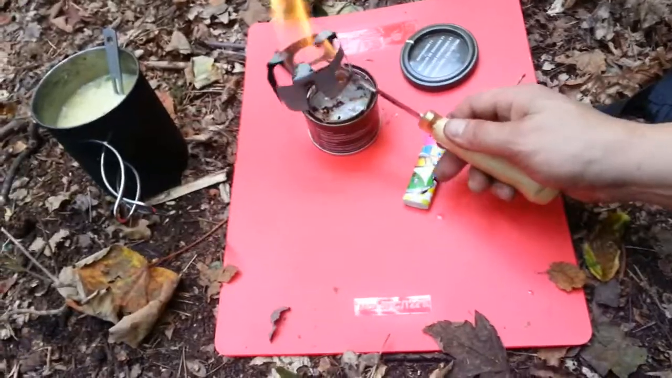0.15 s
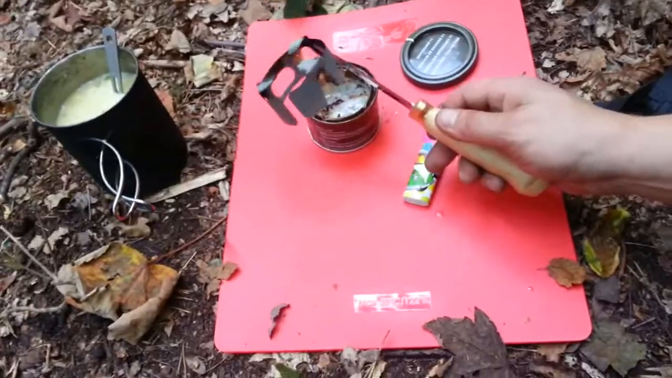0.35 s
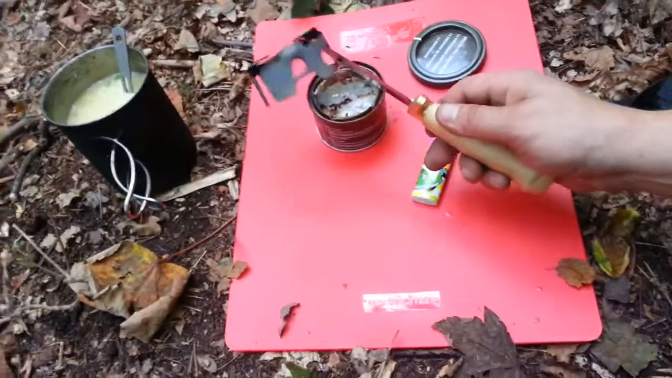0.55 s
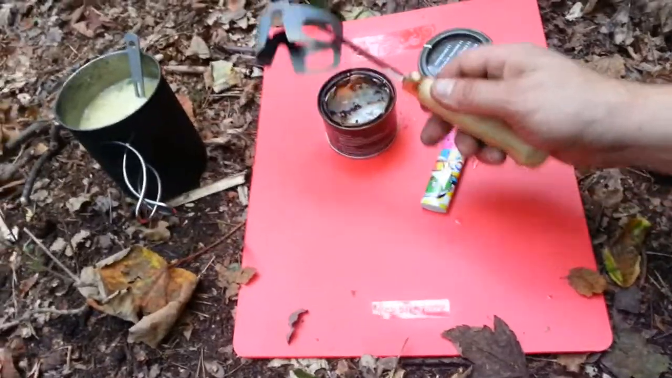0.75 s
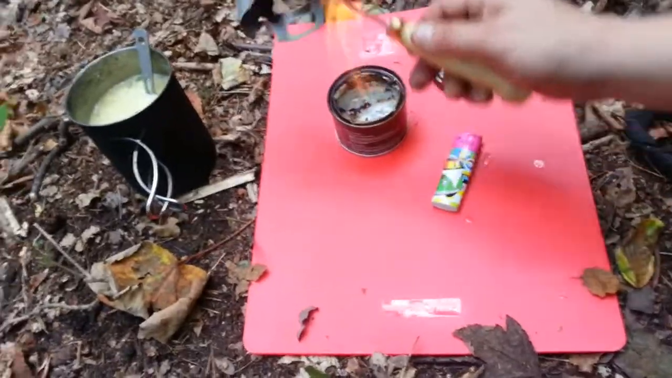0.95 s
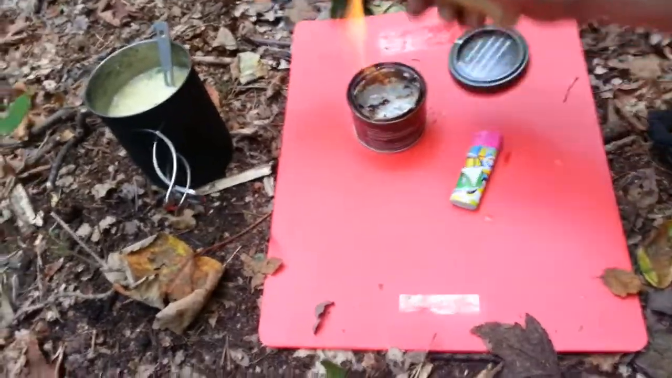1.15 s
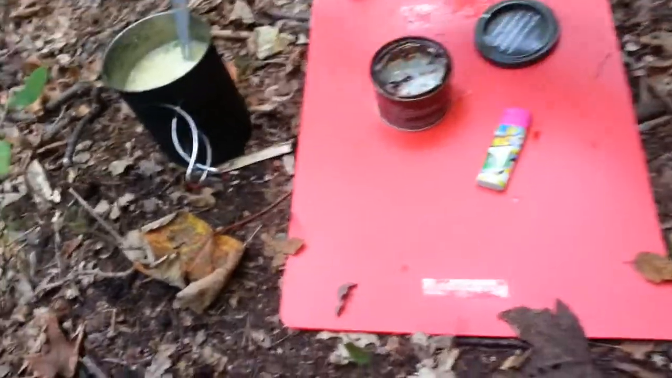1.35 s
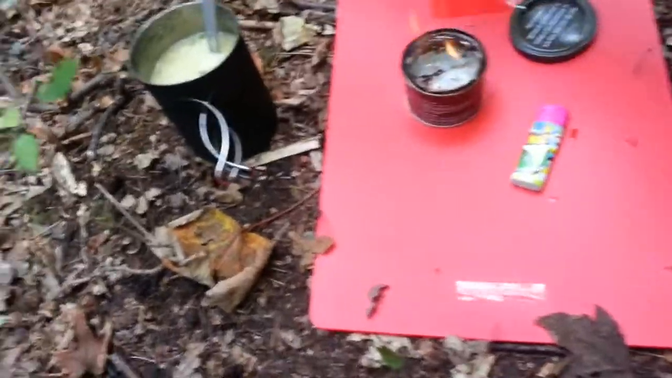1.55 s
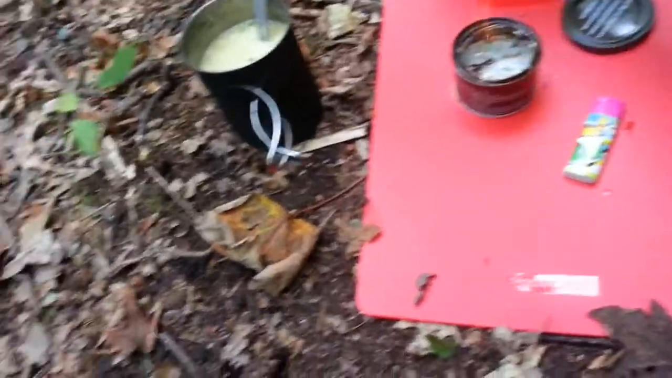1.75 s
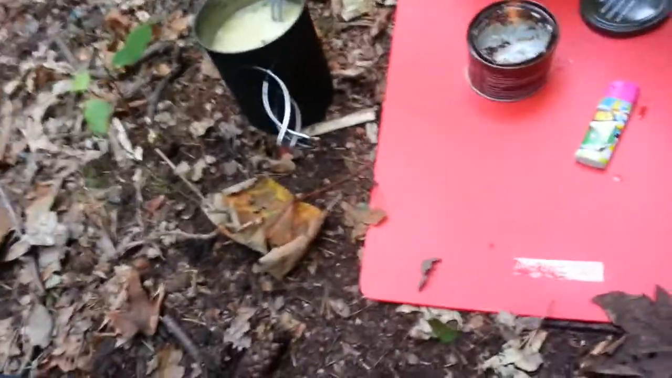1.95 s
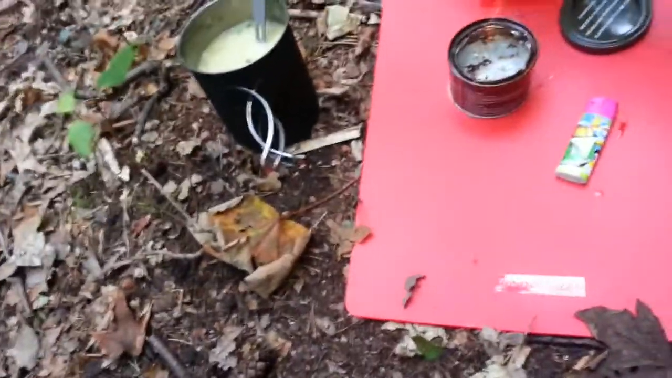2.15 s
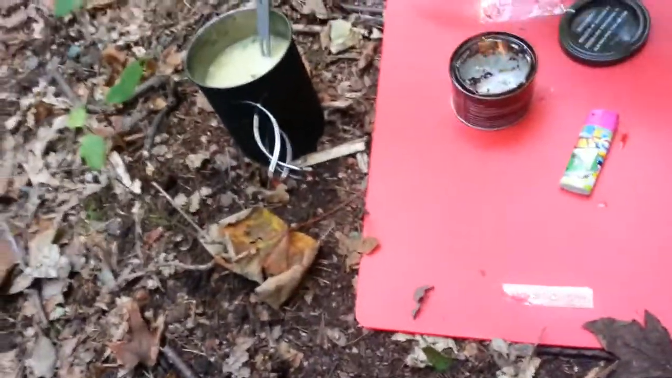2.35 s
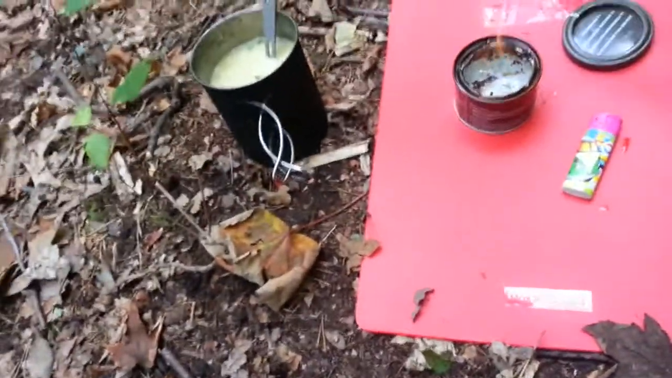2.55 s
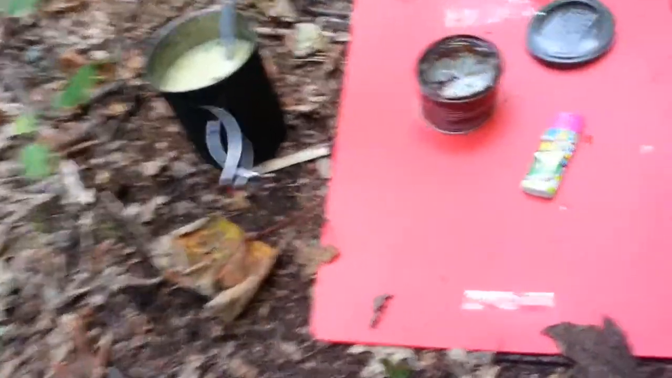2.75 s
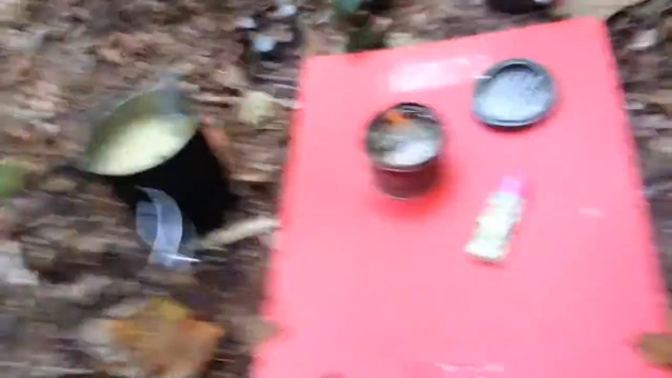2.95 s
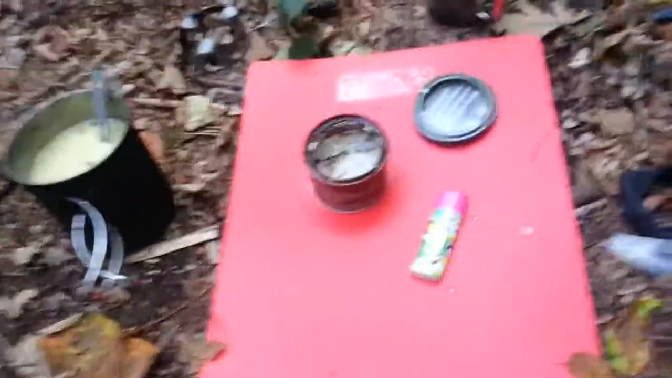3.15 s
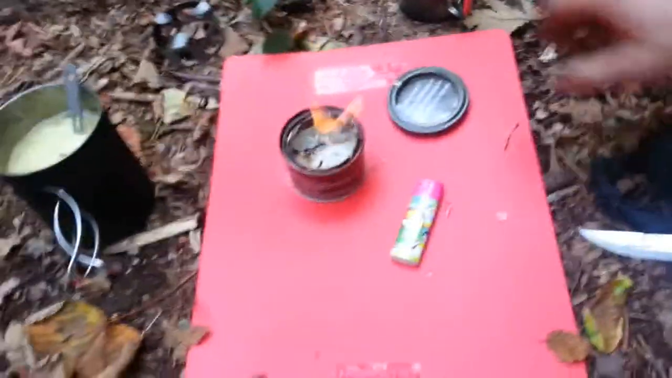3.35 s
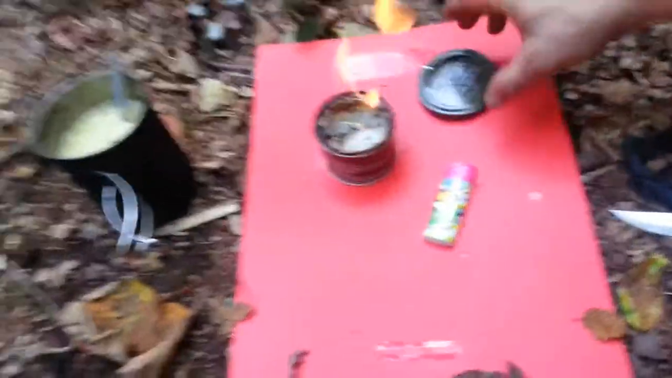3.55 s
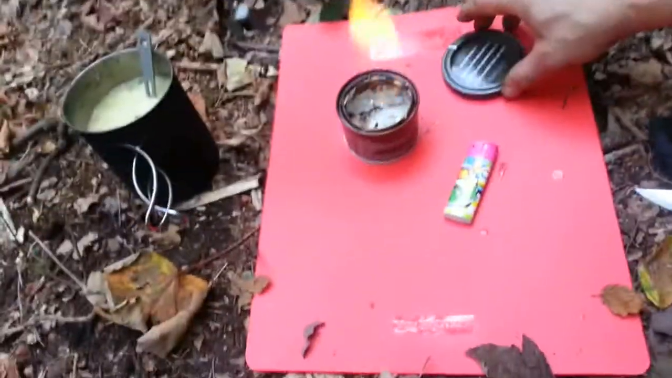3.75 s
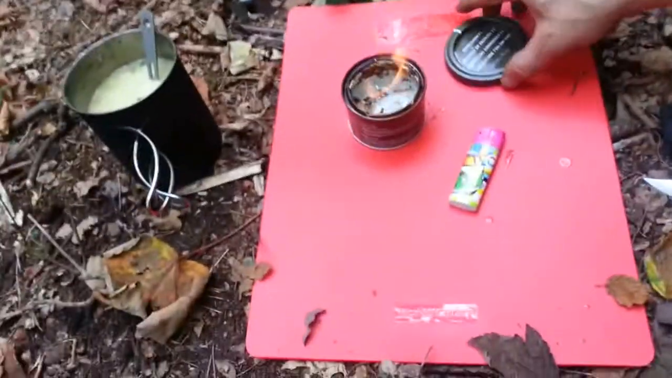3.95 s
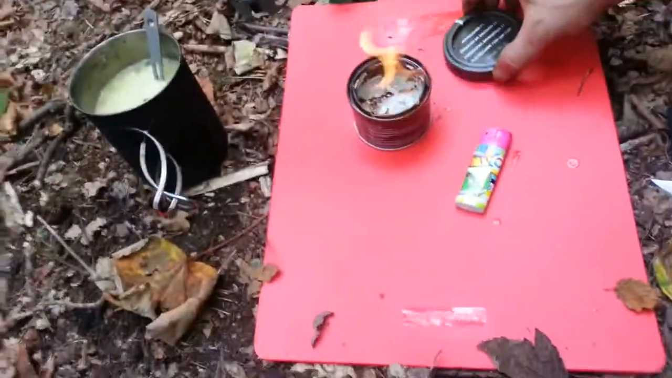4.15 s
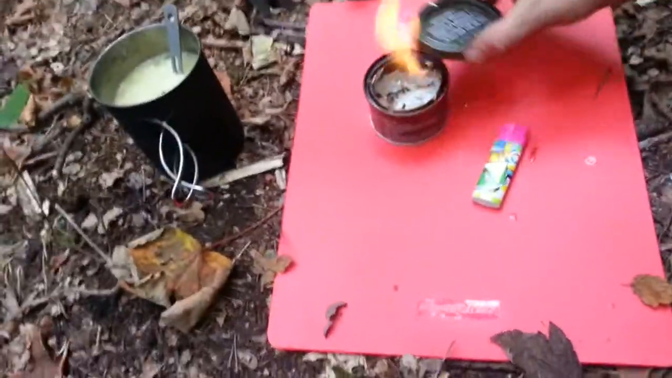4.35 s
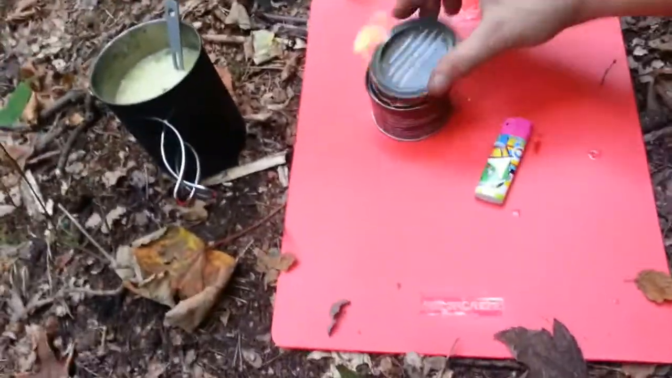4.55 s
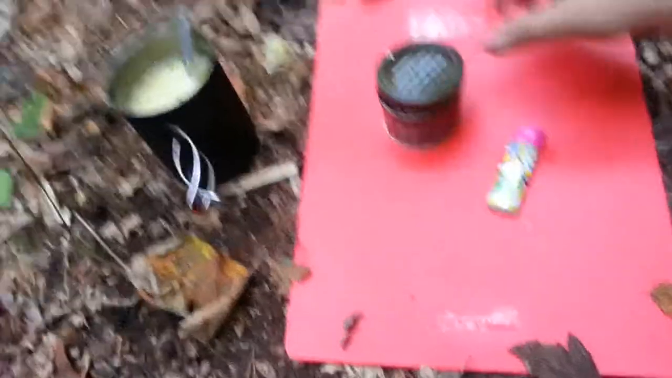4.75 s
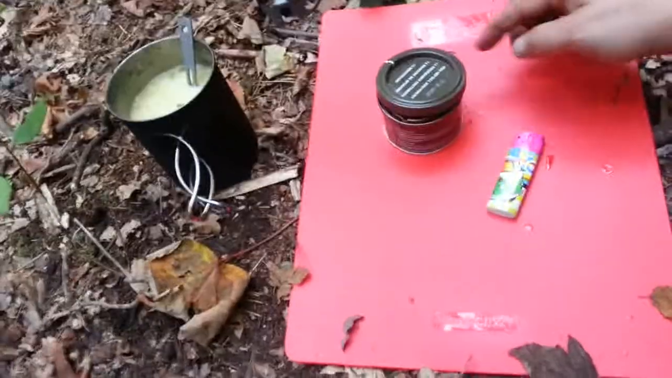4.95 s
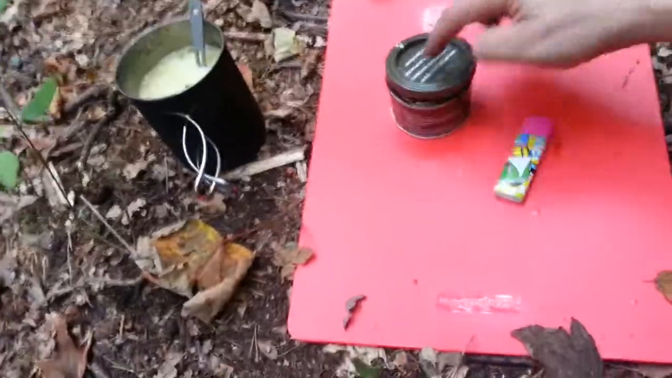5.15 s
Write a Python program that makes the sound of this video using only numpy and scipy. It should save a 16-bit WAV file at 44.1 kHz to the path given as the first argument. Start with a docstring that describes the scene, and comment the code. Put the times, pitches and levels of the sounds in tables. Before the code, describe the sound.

Close metal clicks, scrapes and a sharp clink, soft thuds and leaf snaps, then a loud tin lid clatter in quiet woods.

```python
"""A sheet-steel pot stand, lifted off a tin burner with a knife, on a foam mat in the woods.
Close to a stereo pair, the blade taps and scrapes the steel into ringing; the stand drops among leaves.
The knife is laid down with dull knocks, and dry leaves snap underfoot. A tin lid is picked up and
dropped onto the burner, where it rattles until it seats. Sleeves rustle with the arm movements;
behind it all lie a distant rumble and the quiet hiss of the woods."""
import sys
import numpy as np
from scipy import signal
from scipy.io import wavfile
from scipy.ndimage import uniform_filter1d

SR = 44100
rng = np.random.default_rng(int(sys.argv[2]) if len(sys.argv) > 2 else 0)


def transcribe(u):
    """Save the signal u as a 16-bit wav file named by the first command-line argument.

    u: samples, shape (n,) or (channels, n), limited to [-1, 1]; the rate is SR.
    q: integer samples, one column per channel.
    """
    v = np.clip(np.atleast_2d(u).T, -1, 1)
    q = np.round(v * 32767).astype(np.int16)
    wavfile.write(sys.argv[1], SR, q)


N = 228879


def amp(db):
    return 10 ** (np.asarray(db) / 20)


def rms_one(x):
    return x / np.sqrt(np.mean(x ** 2) + 1e-20)


def at_hz(points, hz):
    freqs, values = np.transpose(points)
    return np.interp(np.log(hz), np.log(freqs), values)


def pan(x, db):
    """Place a sound between the microphones; pan is always left minus right in dB."""
    return np.array([x * amp(db / 2), x * amp(-db / 2)])


def add(out, s, piece):
    at = max(round(s * SR), 0)
    out[:, at:at + piece.shape[1]] += piece[:, :N - at]


def onset(t):
    return np.sin(np.pi / 2 * np.clip(t / 0.0011, 0, 1)) ** 2


def drift(rate_hz):
    """A smooth random wander with an RMS of 1."""
    r = np.exp(-80 * np.pi * rate_hz / SR)
    slow = signal.lfilter([1], [1, -2 * r, r * r], rng.standard_normal(N // 40 + 2002))[2000:]
    return np.interp(np.arange(N) / 40, np.arange(len(slow)), rms_one(slow))


def band(x, hz, octaves):
    edges = np.clip(hz * 2 ** (np.array([-.5, .5]) * max(octaves, .1)), [20, 30], [19000, 20000])
    return signal.sosfilt(signal.butter(2, edges, "band", fs=SR, output="sos"), x)


def moving_band(x, centre_hz, steps_hz, fall_db):
    """Third-octave bands that open near a moving centre."""
    return sum(band(x * amp(-fall_db * np.log2(hz / centre_hz) ** 2), hz, 1 / 3) for hz in steps_hz)


def crack(hz, octaves, t60, noise):
    """A burst of contact noise that swells for a millisecond, steeply banded, peak 1."""
    t = np.arange(noise.shape[-1]) / SR
    burst = band(band(noise * onset(t) * amp(-60 * t / t60), hz, octaves), hz, 2.1 * octaves)
    return burst / np.abs(burst).max()


def strokes(rows, round_top):
    """Swells whose rise and fall span 20 dB: level/dB, time from the peak/s, then the other columns."""
    t = np.arange(0, N + 32, 32) / SR
    s, db, rise, fall, *columns = np.transpose(rows)[:, :, None]
    since = t - s
    lengths = np.where(since < 0, -since / rise, since / fall)
    gain = amp(np.maximum(db - 20 * lengths ** round_top, -200))
    total = gain.sum(axis=0)
    blended = [(gain * c).sum(axis=0) / total for c in (since, *columns)]
    return [np.interp(np.arange(N) / SR, t, c) for c in (20 * np.log10(total), *blended)]


# Likeness of diffuse noise at the two microphones: f/Hz, correlation
LIKENESS = [(60, 0.49), (150, 1), (370, 0.7), (930, -0.012), (2310, -0.048), (5770, 0.11), (14400, -0.13)]


def stereo_bands(colour, flicker_db, white):
    """Half-octave bands of stereo noise, each with its level, flicker and likeness: f/Hz, band."""
    together = drift(14)
    for k, hz in enumerate(30 * 2 ** np.arange(0, 9.4, .5)):
        mid, side = band(white[k % 2], hz, 0.46)
        alike = at_hz(LIKENESS, hz)
        gain = amp(at_hz(colour, hz) + flicker_db * (0.13 * together + drift(23.4)))
        yield hz, gain * (np.sqrt(1 + alike) * mid + np.sqrt(1 - alike) * side * [[1], [-1]])


# Background rumble and hiss, with the lid's halo near 4.55 s: t/s, rumble/dB, hiss or halo/dB
BACKGROUND = [(0, -54.5, -52.5), (.4, -62, -58.5), (.6, -58.5, -53.5), (.8, -63.5, -56), (1.1, -56.5, -50),
              (1.6, -63, -58.5), (1.8, -53.5, -50), (2.2, -59, -53), (2.45, -60.5, -56), (2.9, -59, -53.5),
              (3.35, -62.5, -56.5), (3.75, -61.5, -60.5), (3.92, -56.5, -55), (4.4, -64.5, -62.5),
              (4.55, -65, -38.5), (4.7, -54.5, -46.5), (4.85, -65, -61), (5.19, -60, -54.5)]
# Their spectrum: f/Hz, relative level/dB
BACKGROUND_COLOUR = [(15, -35), (25, -13.5), (85, -7), (512, -19), (1110, -17), (1800, -25), (2000, -23),
                     (3150, -30), (3500, -27.5), (14800, -33)]


def background():
    """Rumble below 250 Hz, hiss above; the hiss flares with the lid's rattle while the rumble ducks."""
    s, *levels_db = np.transpose(BACKGROUND)
    t, parts = np.arange(N) / SR, np.zeros((2, 2, N))
    for hz, noise in stereo_bands(BACKGROUND_COLOUR, 1.5, rng.standard_normal((2, 2, N))):
        parts[int(hz > 250)] += noise
    return sum(amp(np.interp(t, s, db)) * rms_one(part) for db, part in zip(levels_db, parts))


STAND_LAG_S = 0.0001933


def from_stand(x, pan_db):
    """The stand reaches the left microphone a little later."""
    late = np.pad(x, (round(STAND_LAG_S * SR), 0))[:len(x)]
    return np.array([late, x]) * pan(1, pan_db)[:, None]


# The stand, faintly ringing at the start: f/Hz, level/dB, t60/s
FADING_MODES = [(3680, -49.5, 0.29), (7200, -38, 0.08), (1165, -58.5, 0.44)]


def fading_ring():
    """Three modes of the steel die away from an earlier touch."""
    out, t = np.zeros((2, N)), np.arange(SR // 4) / SR
    hz, db, t60 = np.transpose(FADING_MODES)[:, :, None]
    modes = amp(db - 60 * t / t60) * np.sin(2 * np.pi * hz * t)
    add(out, 0, from_stand(modes.sum(axis=0), -2.5))
    return out


# Modes of the steel stand: f/Hz, relative level/dB, nominal decay time/s (a tap falls 75 dB over it before
# added damping)
STAND_MODES = [(3047, 0, 0.3), (4560, 0.5, 0.079), (5080, 6.5, 0.057), (5530, 6, 0.039), (5800, -12, 0.16),
               (5980, -10.5, 0.34), (6310, 0, 0.24), (6150, -13, 0.36), (6990, 2, 0.14), (7230, 1, 0.18),
               (7360, -2, 0.093), (7730, -1.5, 0.12), (8100, -10, 0.3), (9100, -12, 0.28), (9900, -23, .12),
               (11100, -14, 0.3), (11500, -11, 0.1), (12900, -24.5, 0.115), (13400, -16, 0.14)]
# Blade on the stand, close by: t/s, level/dB, crack f/Hz, pan/dB, relative ring level/dB
BLADE_TAPS = [(0.2733, -24.5, 7100, -6.5, -19.5), (0.324, -33, 7040, -23.5, -37),
              (0.5884, -25, 6960, -21.5, -25), (0.756, -37, 6850, -11, -35), (0.959, -40.5, 2470, 13, -9),
              (1.3316, -31, 7230, 5, -18.5), (1.4448, -36, 7040, -9, -27), (1.494, -33.5, 7500, 1, -19),
              (1.7068, -28, 7400, -12.5, -18), (1.724, -14.5, 6650, -25, -37),
              (1.7792, -27.5, 5070, 17, -7.5), (1.842, -1.5, 7560, -5, -17), (2.0154, -25, 5130, 10, -21),
              (2.049, -28.5, 5070, 18, -32), (2.0597, -20.5, 5360, 6, -33), (2.1223, -27, 5140, 21, -38),
              (2.1552, -28, 7040, -11, -34), (2.2005, -30.5, 7550, -16.5, -25), (2.2644, -41, 5540, 4, -30),
              (2.327, -33, 7200, -3, -23)]


def blade_taps():
    """Each touch cracks and rings most the modes near its own pitch; the grip shifts them a little."""
    out, t = np.zeros((2, N)), np.arange(SR // 4) / SR
    hz, db, t60 = np.transpose(STAND_MODES)[:, :, None]
    for s, level_db, centre_hz, pan_db, ring_db in BLADE_TAPS:
        uneven, detune = rng.standard_normal((2, *hz.shape))
        noise = rng.standard_normal(SR // 10)
        held_db = 12 * max(-level_db - 8, 0) * t   # a light touch stays in contact and damps the ring
        near_db = 4 * uneven - 8 * np.log2(hz / centre_hz) ** 2
        swing = onset(t) * amp(db + ring_db + near_db - held_db - 75 * t / t60)
        sound = (swing * np.sin(2 * np.pi * hz * (1 + 0.00377 * detune) * t)).sum(axis=0)
        tick = 1.08 * crack(centre_hz, 0.37, 0.013, noise) + 0.15 * crack(centre_hz, 1.44, 0.045, noise)
        hollow_body = amp(ring_db) * crack(2967, 0.19, 0.067, noise)
        sound[:len(noise)] += tick + hollow_body
        add(out, s, amp(level_db) * from_stand(sound, pan_db))
    return out


# Blade along the stand, left of centre: peak t/s, level/dB, rise/s, fall/s, f/Hz, relative rasp/dB
BLADE_STROKES = [(.279, -49.5, 0.0065, 0.043, 6700, 1.5), (.56, -39, 0.11, 0.12, 6250, -16),
                 (.748, -55.5, 0.0081, 0.06, 6700, -8), (1.44, -54.5, 0.0078, 0.28, 6700, -9),
                 (1.745, -33.5, 0.026, 0.1, 6400, -22.5), (1.788, -36, 0.0078, 0.046, 5370, -17),
                 (1.85, -40.5, 0.0065, 0.17, 6500, -16), (2.07, -40.5, 0.041, 0.056, 5300, -6),
                 (2.118, -32, 0.054, 0.021, 6100, -22.5), (2.16, -46, 0.063, 0.21, 7150, -18),
                 (2.73, -49.5, 0.13, 0.15, 6400, -6.5), (2.86, -50.5, .03, 0.026, 6170, -6)]
SCRAPE_SAG_HZ_PER_S = 1800


def blade_scrape():
    """Dense uneven slips feed a hiss that sinks along each stroke, a low rasp and the stand's modes."""
    level_db, since, centre_hz, rasp_db = strokes(BLADE_STROKES, round_top=1.43)
    centre_hz = np.clip(centre_hz - SCRAPE_SAG_HZ_PER_S * since, 3000, 12000)
    slips = rng.standard_normal((2, N)) * amp(3.7 * drift(160) + level_db)
    slips[0] = 1.804 * slips[0] + 0.33 * np.roll(slips[1], round(STAND_LAG_S * SR))
    hiss = 1.74 * moving_band(slips, centre_hz, 3600 * 2 ** np.arange(0, 2, 1 / 3), fall_db=25)
    rasp = slips * amp(rasp_db)
    out = hiss + 2 * band(rasp, 2000, 2.63) + 1.8 * band(rasp, 2850, 0.68)
    for hz, db, t60 in STAND_MODES[1:13]:
        r = amp(-130 / (t60 * SR))   # the pressing blade damps the mode
        w = 2 * np.pi * hz / SR
        fed = slips * amp(db - 31.5 - 29 * np.log2(hz / centre_hz) ** 2)
        out += signal.lfilter([0, np.sin(w)], [1, -2 * r * np.cos(w), r * r], fed)
    return out * pan(1, 1.1)[:, None]


# Dull knocks on mat and ground, mostly to the left: t/s, level/dB, f/Hz, t60/s, pan/dB
KNOCKS = [(0.883, -35.5, 193, 0.017, 5), (2.264, -29, 400, 0.005, 8), (2.955, -35, 1200, 0.024, 7),
          (3.01, -29.5, 850, 0.018, 25.5), (3.016, -21.5, 810, 0.012, -5), (3.042, -16.5, 1080, 0.026, 6),
          (3.065, -26, 210, 0.03, 1), (3.092, -27, 233, 0.019, 1), (3.824, -23, 1530, 0.011, 8),
          (3.897, -23.5, 1410, 0.013, 6), (5.108, -45.5, 970, 0.035, 12), (5.131, -36, 925, 0.058, -13),
          (5.142, -35, 930, 0.023, 23), (5.151, -39.5, 1010, 0.087, -7)]


def knocks():
    """A short push into one damped resonance, with a dull puff around it and a faint click."""
    out, t = np.zeros((2, N)), np.arange(SR // 10) / SR
    for s, level_db, hz, t60, pan_db in KNOCKS:
        noise = rng.standard_normal(len(t))
        body = 1.1 * np.sin(2 * np.pi * hz * t) * onset(t) * amp(-60 * t / t60)
        puff = 0.5 * crack(hz / 2, 2.28, t60, noise)
        click = 0.11 * crack(4 * hz, 2.2, 0.04, noise)
        add(out, s, amp(level_db) * pan(body + puff + click, pan_db))
    return out


# Sleeves, nearer the left microphone: peak t/s, level/dB, rise/s, fall/s, pan/dB
SLEEVE_MOVES = [(1.18, -48, 0.17, 0.18, 12.5), (2.74, -47.5, 0.37, 0.2, 11), (3.21, -47, 0.11, 0.23, 7.5),
                (3.68, -62, 0.48, 0.17, 9), (4.19, -59.5, 0.31, 0.19, 12.5)]
# Spectrum of the cloth: f/Hz, relative level/dB
CLOTH_COLOUR = [(120, -37), (200, -17), (386, -7.5), (504, -15), (1490, -22), (2830, -20), (6290, -20.5),
                (14000, -40)]
# Resonances of its folds: f/Hz, width/Hz, level of the added band/dB
CLOTH_FOLDS = [(390.7, 67, 2.5), (2620, 1500, -2)]


def sleeves():
    """Cloth slips in clumped fine grains; its folds lift two broad resonances."""
    level_db, _, pan_db = strokes(SLEEVE_MOVES, round_top=1.56)
    grains = rng.standard_normal((2, 2, N)) * amp(1.7 * drift(170))
    cloth = sum(noise for _, noise in stereo_bands(CLOTH_COLOUR, 0.76, grains))
    folds = sum(amp(db) * band(cloth, hz, width / hz) for hz, width, db in CLOTH_FOLDS)
    return amp(level_db) * rms_one(cloth + folds) * pan(1, pan_db)


# The stand's edge, well to the left: peak t/s, level/dB, rise/s, fall/s, f/Hz, sag/(Hz/s)
EDGE_SQUEALS = [(1.9, -30, .008, .03, 5244, 100), (2.06, -30, .025, 0.049, 5105, 7060),
                (2.12, -33.5, 0.079, .01, 4600, 8000)]


def edge_squeal():
    """The edge squeals as the stand slides off; uneven slips chop the falling tone into a narrow band."""
    level_db, since, hz, sag = strokes(EDGE_SQUEALS, round_top=1.7)
    hz = np.maximum(hz - sag * since, 0)
    tone = np.sin(2 * np.pi * np.cumsum(hz) / SR)
    slips = rms_one(band(rng.standard_normal(N), 105, 2.4))
    return from_stand(amp(level_db) * slips * tone, 13)


# Things dragged on the mat, to the left: peak t/s, level/dB, rise/s, fall/s, centre f/Hz
MAT_SCUFFS = [(2.962, -45.5, .006, 0.026, 1100), (3.05, -35, 0.0054, 0.084, 338),
              (3.094, -27, 0.11, 0.0095, 290), (3.69, -49.5, 0.033, .07, 1190),
              (3.815, -44, .012, 0.036, 880), (3.897, -30.5, 0.019, 0.018, 1310),
              (5.12, -42.5, .012, 0.027, 930), (5.16, -47.5, 0.035, 0.035, 960)]


def mat_scuffs():
    """Rough friction on foam: lumpy noise around a low centre, with a thin bright edge."""
    level_db, _, centre_hz = strokes(MAT_SCUFFS, round_top=1.84)
    rub = rng.standard_normal(N) * amp(level_db + 4 * drift(60))
    low = 3.05 * moving_band(rub, centre_hz, 125 * 2 ** np.arange(0, 5, 1 / 3), fall_db=6)
    edge = 0.4 * band(rub * centre_hz / 1500, 4500, 1.8)
    return pan(low + edge, 8.8)


# Leaves on the ground, mostly to the right: t/s, level/dB, pan/dB
LEAF_SNAPS = [(3.1894, -30.5, -17), (3.195, -35, -4), (3.2114, -37, 0.5), (3.229, -30.5, -15),
              (3.245, -39, 2.0), (3.257, -28.5, -12), (3.3331, -36.5, -2)]


def leaf_snaps():
    """Dry leaves break under a shifting foot: short broad cracks with no ring."""
    out = np.zeros((2, N))
    for s, level_db, pan_db in LEAF_SNAPS:
        snap = crack(hz=6500, octaves=1.44, t60=0.015, noise=rng.standard_normal(SR // 20))
        add(out, s, 0.82 * amp(level_db) * pan(snap, pan_db))
    return out


# Modes of the tin lid at the two microphones: f/Hz, pan/dB, phase lead on the left/rad
LID_MODES = [(380, 3.3, 0.2), (1005, -1.7, -1.2), (1166, 1.1, -0.5), (1225, 3.4, -0.2), (1533, 15.1, -2.4),
             (2412, 3.7, -0.9), (2756, 1.8, -1.2), (3473, 6.9, -2.1), (3522, 7.1, -2.1), (4089, 8.2, 1.7),
             (4540, 0.9, -0.9), (4661, 1.8, -0.9), (5254, 6.9, -2.5), (5750, -1.5, -0.1),
             (6024, -0.4, -0.0), (6515, -0.8, -1.9), (6853, -4.6, -0.2), (7280, -7.1, -0.3),
             (7456, -8.3, 0.8), (7763, -10.3, 1.1), (8312, -10.2, -0.6), (8560, -10.6, -1.1),
             (9275, -8.0, 2.5), (10850, -3.9, -0.1), (11370, -4.4, 0.2), (12570, -1.6, -2.5)]
# The same modes: relative level/dB, t60 in the air/s,
# added damping when held or seated/(dB/s), never less than 150: lower entries are raised to it
LID_DECAYS = [(-21, 0.17, 198), (3.5, 0.32, 1208), (-18, 0.1, 700), (-14, .3, 695), (-9.5, 0.096, 496),
              (-18.5, 0.17, 95), (6.5, 0.25, 915), (-4, 0.21, 591.5), (-5.5, 0.24, 603), (1.5, 0.23, 195),
              (-2.5, 0.22, 144), (-4, 0.45, 186), (-13, 0.26, 96), (0, 0.54, 131), (-13, 0.63, 34.5),
              (-2, 0.87, 30), (-4, .15, 97), (-5.5, 0.24, 104), (-3.5, 0.18, 102), (-11.5, 0.44, 22),
              (-23, 0.17, 35), (-8, 0.29, 20), (-8, 0.46, 16), (-15, 0.19, 20), (-27, .15, 20),
              (-23, .14, 22)]
# Lid picked up, then dropped on the burner: t/s, crack/dB, ring/dB, tilt above 1 kHz/(dB/octave)
LID_CONTACTS = [(3.8249, -54, -29, -10), (4.4583, -17.5, -12, -7), (4.4717, -7, -11, -3),
                (4.4912, -4.5, -18, -3), (4.5128, -13, -16, -1.5), (4.534, -15, -18, -1),
                (4.558, -19.5, -19.5, -0.5), (4.5786, 0.5, -12.5, -8), (4.5856, -20, -9.5, -4),
                (4.605, -7.5, -19, -1), (4.6271, -10, -24.5, 0)]
LID_KEPT, LID_DETUNE = 0.36, 0.0015   # per contact: share of ringing that survives, relative pitch spread
SEATED_S, CHATTER_DB = 4.648, 1.5


def lid_rattle():
    """Every contact cracks, feeds the lid's modes and takes a share of the older ringing away."""
    out, t = np.zeros((2, N)), np.arange(SR // 3) / SR
    hz, pan_db, lead = np.transpose(LID_MODES)[:, :, None]
    db, t60, damping = np.transpose(LID_DECAYS)[:, :, None]
    damping = np.maximum(damping, 150)
    times = np.array(LID_CONTACTS)[:, 0]
    for s, crack_db, ring_db, tilt_db in LID_CONTACTS:
        later_contacts = np.searchsorted(times[times > s] - s, t).astype(float)
        surviving = LID_KEPT ** uniform_filter1d(later_contacts, size=180)
        damped_s = t if s == times[0] else np.maximum(t + s - SEATED_S, 0)   # fingers hold it at first
        uneven, jolt, detune = rng.standard_normal((3, *hz.shape))
        struck_db = ring_db + tilt_db * np.log2(np.maximum(hz / 1000, 1)) + db + 2 * uneven
        swing = onset(t / 1.3) * amp(struck_db - 60 * t / t60 - damping * damped_s) * surviving
        phase = 2 * np.pi * hz * (t + s + LID_DETUNE * detune * t) + 0.95 * jolt
        sound = (pan(swing, pan_db) * np.sin([phase + lead / 2, phase - lead / 2])).sum(axis=1)
        noise = rng.standard_normal((3, SR // 10))
        noise = noise[:2] + noise[2]   # partly shared by both microphones
        tick = crack(7500, 0.4, 0.022, noise) + 0.67 * crack(5500, 2.1, 0.1, noise)
        clack = 0.71 * amp(ring_db) * crack(714, 2.5, 0.11, noise)
        sound[:, :SR // 10] += amp(crack_db) * tick * pan(0.67, -7)[:, None] + clack
        add(out, s, sound)
    loose = np.arange(N) < SEATED_S * SR
    return out * amp(CHATTER_DB * drift(90) * loose)   # faint touches of the rim make it waver


def scatter(blows, level_db=-26.5, t60=0.14, low_hz=200, high_hz=3800):
    """Ground and trunks throw the blows back as a dull diffuse tail, its own at each microphone."""
    t = np.arange(SR // 2) / SR
    tail = band(rng.standard_normal((2, len(t))), np.sqrt(low_hz * high_hz), np.log2(high_hz / low_hz))
    tail *= amp(-60 * t / t60)
    tail /= np.linalg.norm(tail, axis=1, keepdims=True)
    return amp(level_db) * signal.fftconvolve(blows, tail, axes=1)[:, :N]


def scene():
    """All that reaches the pair: the background, the rubbing sounds, the blows and their scatter."""
    blows = fading_ring() + blade_taps() + knocks() + lid_rattle() + leaf_snaps()
    sustained = background() + sleeves() + blade_scrape() + edge_squeal() + mat_scuffs()
    return sustained + blows + scatter(blows)


LIMIT_DB, RECOVERY_DB_PER_S, CUTOFF_HZ = -1, 56.5, 15300


def record(dry):
    """The recorder's limiter ducks on the loudest blows and recovers; the top is cut."""
    ramp = RECOVERY_DB_PER_S * np.arange(N) / SR
    over_db = np.maximum(20 * np.log10(np.abs(dry).max(axis=0) + 1e-9) - LIMIT_DB, 0)
    duck_db = np.maximum.accumulate(over_db + ramp) - ramp
    limited = dry * amp(-uniform_filter1d(duck_db, size=88))
    lowpass = signal.cheby2(12, 60, CUTOFF_HZ, fs=SR, output="sos")
    return np.clip(signal.sosfilt(lowpass, limited), -1, 1)


dry = scene()
out = record(dry)
transcribe(out)
```